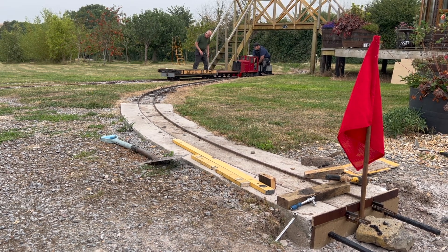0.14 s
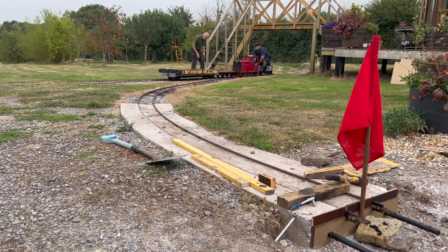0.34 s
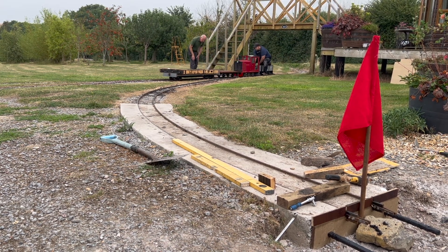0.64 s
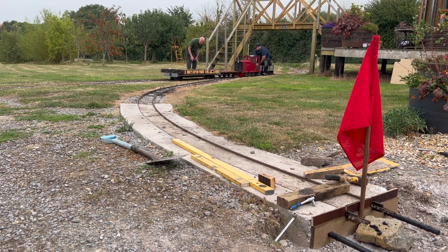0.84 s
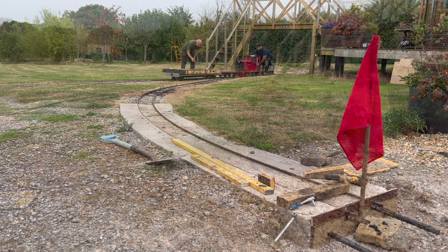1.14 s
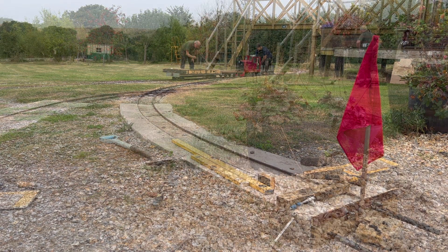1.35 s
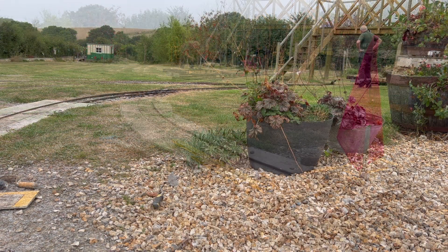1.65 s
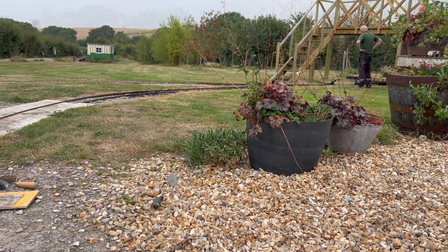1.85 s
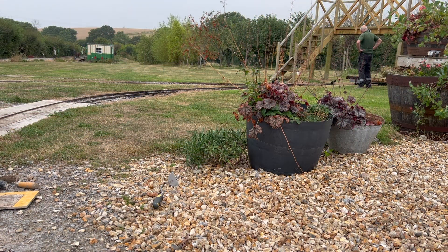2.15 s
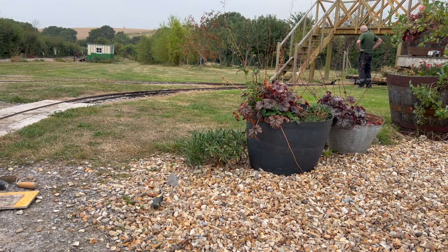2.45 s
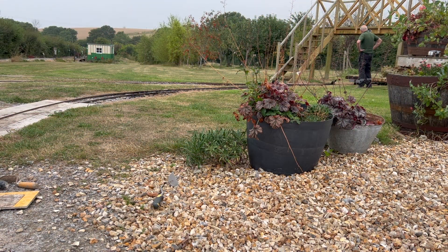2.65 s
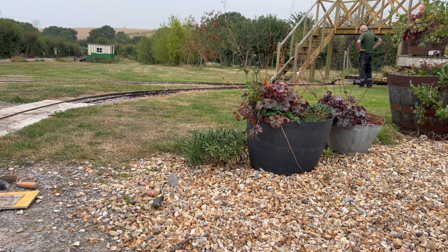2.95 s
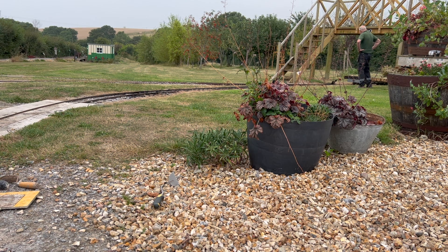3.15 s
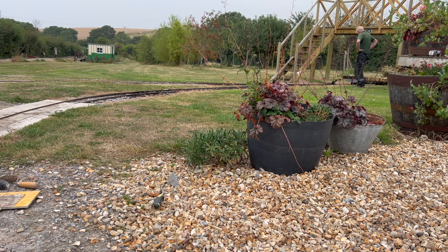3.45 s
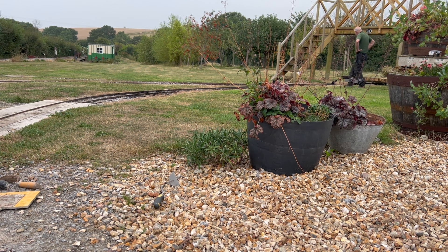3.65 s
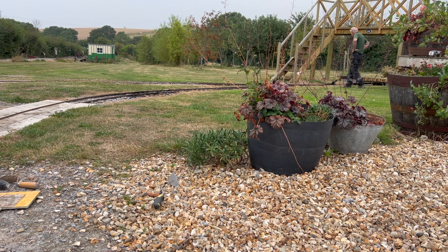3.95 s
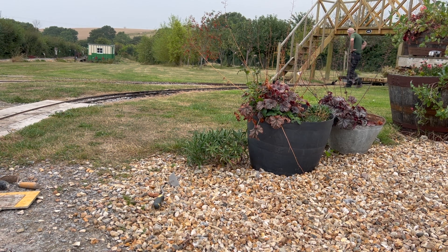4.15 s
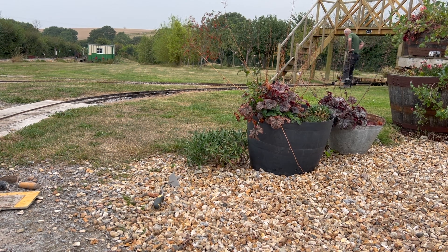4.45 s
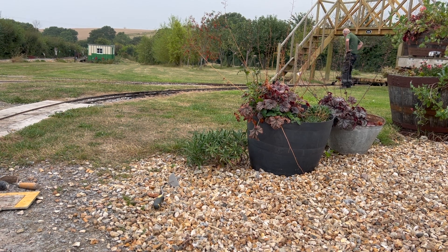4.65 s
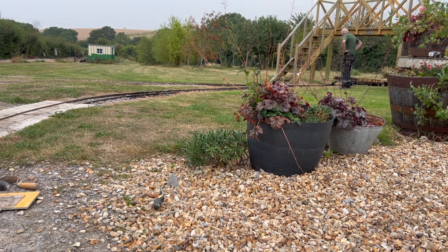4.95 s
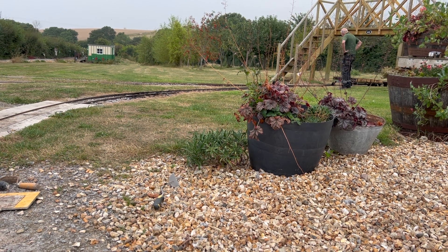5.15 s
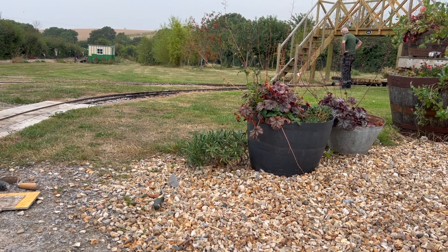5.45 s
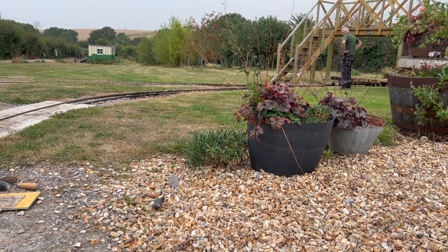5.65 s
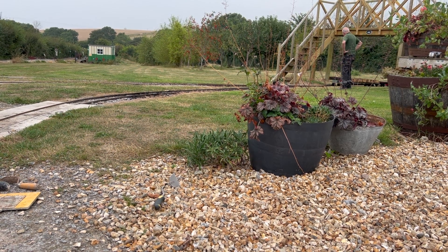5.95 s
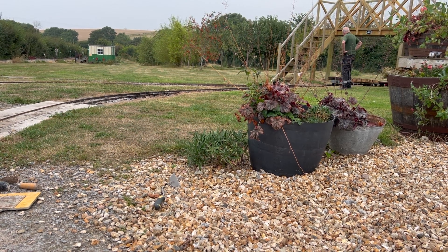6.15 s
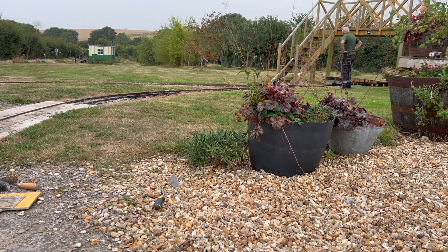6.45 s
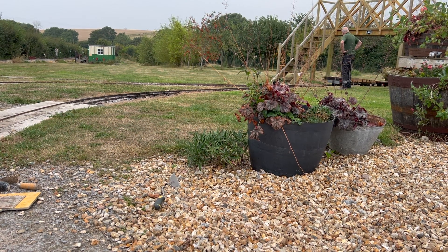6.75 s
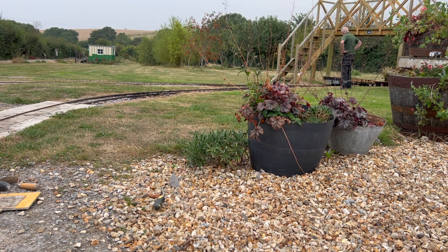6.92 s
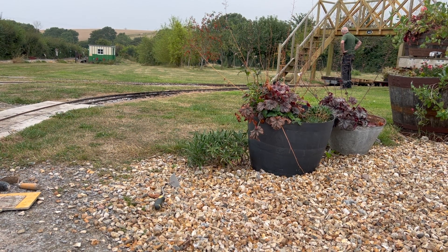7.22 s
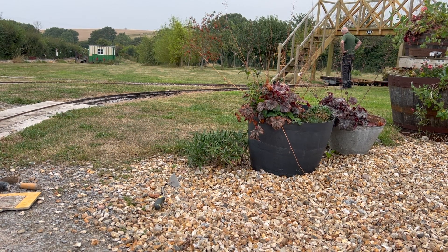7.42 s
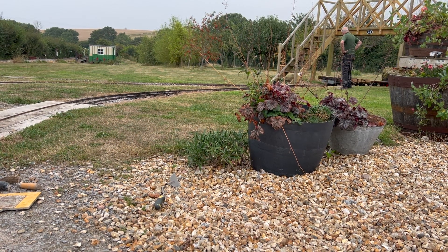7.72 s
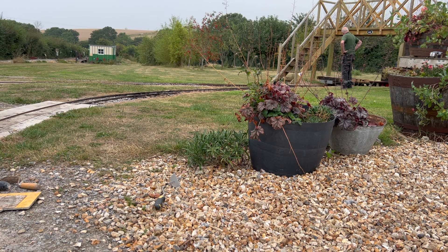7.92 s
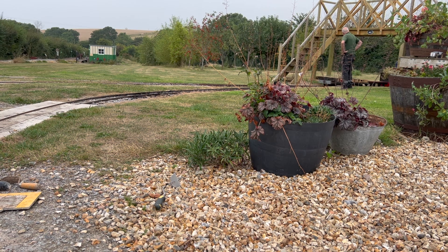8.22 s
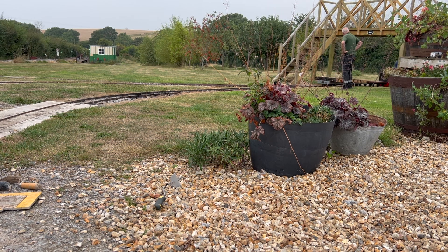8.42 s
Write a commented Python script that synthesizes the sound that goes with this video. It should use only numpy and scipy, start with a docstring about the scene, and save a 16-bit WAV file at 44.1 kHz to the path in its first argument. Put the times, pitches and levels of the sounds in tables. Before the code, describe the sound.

From 0 to about 1 s a small single-cylinder petrol engine idles in an open garden: roughly ten lumpy, irregular thumps a second, each puffing hollowly through the silencer, knocking the body and shaking loose tinware into thin rattles and pings. A dull knock falls at 0.3 s; a dry, bright snap with a tiny ring at 1.1 s. Between 1 and 1.8 s the idle dissolves into a hauling engine, a fast low putter of about 22 beats a second with fluttering exhaust. Around 2.3 to 2.7 s it sags in speed and pitch, stays slower until about 3.1 s, recovers by 3.7 s, then hunts gently up and down. Mechanical drone, hiss and high whine grow slightly, brighter from 5 to 7.3 s. A distant bird gives quick high whistles from 5.8 to 6.5 s. The engine continues to the end at 8.6 s, slowing slightly. Stereo outdoor pickup, little reverberation.

```python
"""Across a garden, a small single-cylinder petrol locomotive, heard from two places joined by a dissolve.
At the first it idles: slow uneven pulses ring the silencer, knock the body and rattle the tinware.
At the second it hauls a wagon: harmonics thump once a cycle while the governor hunts, over silencer flutter,
a fan's tone and shaped noise for the mechanism. A knock, a dry snap and a far bird's whistles are added.
Two microphone ports hear each sound with differences of level, phase and likeness."""
import sys
import numpy as np
from scipy import signal
from scipy.fft import rfft, irfft, next_fast_len
from scipy.io import wavfile
from scipy.ndimage import uniform_filter1d

SR = 44100
rng = np.random.default_rng(int(sys.argv[2]) if len(sys.argv) > 2 else 0)


def master_out(mix):
    """Clip the mix to full scale and print it as 16-bit PCM to the path in sys.argv[1]."""
    frames = np.transpose(np.atleast_2d(mix))
    ceiling = np.clip(frames, -1, 1)
    pcm = np.round(ceiling * 32767).astype(np.int16)
    wavfile.write(sys.argv[1], SR, pcm)


N = 378378
TIME = np.arange(N) / SR
DIRECT = np.array([[1], [0]])  # puts a sound in row 0, with no diffuse part in row 1
CRUISE_PER_S, MIDWAY_S = 22, 5  # reference firings per second, reference moment

# Engine speed while hauling: t/s, firing rate/Hz
FIRING = [(1.0, 23.52), (2.08, 21.6), (2.29, 21.4), (2.7, 17.79), (3.08, 17.92), (3.73, 21.86),
          (4.29, 20.91), (4.76, 22.75), (5.22, 22.05), (5.46, 22.74), (5.89, 21.62), (6.33, 22.19),
          (6.77, 21.91), (7.01, 22.72), (7.2, 21.97), (7.63, 23.42), (7.86, 22.54), (8.26, 22.35),
          (8.58, 20.52)]
# Hauling effort: t/s, thump level/dB, silencer flutter level/dB, fan whistle level/dB
EFFORT = [(1.0, -33.5, -34, -75), (1.75, -28, -34.5, -72), (2.0, -29, -36, -63.5), (2.3, -27.5, -34.5, -62),
          (2.5, -31.5, -41, -78), (2.7, -28.5, -39, -80), (3.0, -28.5, -42.5, -78), (3.3, -29, -40.5, -76),
          (3.75, -28, -33.5, -67.5), (4.2, -29.5, -37.5, -60), (4.4, -28.5, -32, -62.5),
          (4.8, -27.5, -34, -59.5), (5.45, -28, -33, -62), (5.7, -28, -32.5, -57.5),
          (5.95, -27.8, -35, -68), (6.3, -27, -36, -59), (6.75, -28, -33, -67), (7.0, -27, -30, -59),
          (7.2, -28.5, -35, -67), (7.55, -27.7, -33.5, -59), (7.9, -28.5, -33, -62),
          (8.25, -28.5, -33.5, -70), (8.58, -29.5, -34.5, -70)]


def hauling():
    """Exhaust, silencer, fan and mechanical noise share one course of firing rate and cycles."""
    rate = columns(FIRING)[0]
    surge = wander(per_s=7)
    thump_db, flutter_db, fan_db = columns(EFFORT)
    cycles = np.cumsum(rate * (TIME >= FIRING[0][0])) / SR
    crank = np.cos(2 * np.pi * (2 * cycles - .2))  # once each turn, twice each cycle
    sound = exhaust_with_sway(cycles, rate, thump_db)
    sound = sound + silencer_flutter(flutter_db + 3.5 * crank + .4 * surge)
    sound = sound + DIRECT * fan_whistle(cycles, fan_db)
    return sound + mechanical_noise(rate, crank, surge)


# Continuous low noise under the thumps: f/Hz, relative density/dB
SWAY = [(20, -30), (38, -5), (52, 1), (75, -1), (110, 0), (170, -1), (250, -14), (450, -30), (600, -60)]


def exhaust_with_sway(cycles, rate, thump_db):
    """The exhaust's thumps over continuous low noise, both following the hauling effort."""
    sway = noise(spectrum(SWAY), patchy_db=0.0, size=2048)
    return amp(thump_db) * (DIRECT * exhaust(cycles, rate) + amp(-10) * sway)


# Exhaust harmonics at the cruising rate: f/Hz, relative level/dB
PIPE = [(20, -46), (44, -13.5), (66, -6), (88, 0), (110, 3), (132, 0.5), (154, -2.5), (176, -4.5),
        (200, -23.5), (260, -29), (330, -19)]
# Exhaust harmonics change level over time, each at its own rate:
# multiple of the firing rate, change of relative level/(dB per s)
HARMONIC_DRIFT = [(2, 1), (3, 0.2), (4, 0.6), (5, 0), (6, 0), (7, 0.26), (9, 0.5)]
NOTE_WAVER_DB = 1.0  # each exhaust note wavers on its own


def exhaust(cycles, rate):
    """Harmonics of the firing rate in step make one thump a cycle; strength and timing vary by firing."""
    steps = np.arange(int(cycles[-1]) + 2)
    strength, slip = (np.interp(cycles, steps, v) for v in rng.standard_normal((len(steps), 2)).T)
    beat = np.zeros(N)
    for k in range(1, 14):
        # the lowest notes leave the pipe late
        lag = 7.5 / (1 + (k / 3.2) ** 12)
        turns = k * (cycles + .03 + .006 * slip) - (.3 - lag) / (2 * np.pi)
        db_per_s = np.interp(k, *np.transpose(HARMONIC_DRIFT))
        drift_db = db_per_s * (TIME - MIDWAY_S) + NOTE_WAVER_DB * wander(per_s=6)
        # slower pulses are longer, so their spectrum slides down
        pipe_hz = k * rate * (CRUISE_PER_S / rate) ** .6
        beat -= amp(drift_db + read(PIPE, pipe_hz)) * np.cos(2 * np.pi * turns)
    return evened(beat) * (1 + .06 * strength)


SINGING = .6  # share of the flutter's power that sings


def silencer_flutter(level_db):
    """Noise through the silencer's resonances, mixed with the singing of its chambers."""
    flutter = noise(silencer, patchy_db=.4, size=2048)
    flutter = np.sqrt(1 - SINGING) * flutter + np.sqrt(SINGING) * DIRECT * singing()
    return amp(level_db) * flutter


# Resonances of the silencer's chambers: f/Hz, width/Hz, relative level/dB
SILENCER = [(222, 46, 3), (282, 46, -5.5), (370, 65, -22)]
SING_STRAY = .22  # pitch stray, in resonance widths


def silencer(hz):
    """Response of the silencer's resonant chambers."""
    return level_humps(SILENCER, hz)


def singing():
    """The silencer's chambers hum unsteady notes that stray about their resonances."""
    notes = []
    for f, width, db in SILENCER:
        pitch_hz = f + SING_STRAY * width * wander(per_s=40)
        notes.append(amp(db) * np.sqrt(width) * np.sin(2 * np.pi * np.cumsum(pitch_hz) / SR))
    return evened(sum(notes))


FAN_ORDER = 30  # blade passes in one cycle


def fan_whistle(cycles, level_db):
    """A fan sings one tone at its blade-pass rate, wavering a little in level and phase."""
    level = amp(level_db + 1.2 * wander(per_s=8))
    return level * np.sqrt(2) * np.sin(2 * np.pi * FAN_ORDER * cycles + 0.14 * wander(per_s=21))


# Spectra of the mechanical noise, from drone up to fizz: f/Hz, relative density/dB
DRONE = [(250, -23), (420, -10.5), (560, -7), (660, -6), (862, -3), (1260, -3.5), (1500, -3.5), (1950, -53),
         (3300, -120)]
HISS = [(880, -43), (1500, -4.5), (1660, -4.5), (1980, -5), (2330, -7), (2640, -2), (2950, -4), (3270, -6),
        (4230, -11), (7000, -8), (9100, -34), (15400, -120)]
WHINE = [(4120, -19), (7000, -7.5), (7450, 2.5), (7930, 1.5), (8870, 0.5), (9360, 3.5), (10000, -13),
         (13000, -60), (22000, -120)]
FIZZ = [(6000, -46), (10200, 5.5), (11000, 1), (12700, -17.5), (13300, 5), (13900, -49), (14000, -23),
        (14300, -6), (15800, -3)]
# Casing resonances: f/Hz, width/Hz, lift/dB
CASING = [(860, 54, 0.5), (1148, 67, 6), (1558.5, 28, 8), (1940, 26, 5), (3860, 68, 10.5), (6660, 126, -19),
          (8060, 150, 3), (8710, 160, 8)]
# Layer laws: level/dB at cruising speed midway, level/dB per extra firing a second,
# level/dB per s of approach, level/dB of surging
DRONE_LAW = (-50, 1.4, 1.0, 0.5)
HISS_LAW = (-46.5, 0.7, .5, 0.02)
WHINE_LAW = (-53.5, .5, 0.35, -1.1)  # before the swell below
# Extra growth of the whine as the engine comes into the open: start t/s, end t/s, rise/dB
WHINE_SWELL = (4.7, 7.33, 4.55)
# Broad, rough whirrs: f/Hz, width/Hz, level/dB midway, level/dB per s of approach, wavering/dB
WHIRRS = [(2633, 250, -56.5, 0.4, 1.4), (3270, 330, -61, 2, 1.5)]


def mechanical_noise(rate, crank, surge):
    """Drone, hiss and whine follow speed, approach and crank; fizz, steady howl and growing whirrs join."""
    drone_db, hiss_db, whine_db = (
        db + by_speed * (rate - CRUISE_PER_S) + by_time * (TIME - MIDWAY_S) + by_surge * surge
        for db, by_speed, by_time, by_surge in (DRONE_LAW, HISS_LAW, WHINE_LAW))
    swell_start, swell_end, swell_db = WHINE_SWELL
    whine_db = whine_db + swell_db * ramp(swell_start, swell_end)
    drone = noise(spectrum(DRONE, CASING), patchy_db=1.1)
    howl = noise(lambda hz: humps([(1035, 70, .9)], hz), patchy_db=1.5, size=2048)
    hiss = noise(spectrum(HISS, CASING), patchy_db=1.07)
    whine = noise(spectrum(WHINE, CASING), patchy_db=1.5)
    fizz = noise(spectrum(FIZZ), patchy_db=3.0)
    sound = amp(drone_db + 1.0 * crank) * drone
    sound += amp(hiss_db + 0.4 * crank) * hiss
    sound += amp(-61.5) * howl
    sound += amp(whine_db - 0.96 * crank) * whine  # strongest when the drone is weakest in the turn
    sound += amp(-64 + 2.42 * (whine_db + 53.5)) * fizz  # exaggerates the whine's slower changes
    for f, width, db, by_time, waver_db in WHIRRS:
        whirr = noise(lambda hz: humps([(f, width, 1)], hz), patchy_db=2)
        sound += amp(db + by_time * (TIME - MIDWAY_S) + waver_db * wander(per_s=9)) * whirr
    flicker_db = .6 * wander(per_s=30)
    return amp(flicker_db) * sound


# Idling: t/s, change of rumble and hiss level/dB, level of the frame's boom/dB
IDLE = [(0.0, -1, -56), (.14, -1, -42), (0.26, -1.5, -50), (.33, -3, -41.5), (.5, -4, -45.5),
        (.66, -4, -40), (0.76, -6, -60), (.92, -5, -66), (1.07, -1.5, -38), (1.2, -2.5, -44),
        (1.33, -1, -39), (1.6, 0, -35)]
# Idling firings: t/s, thump peak level/dB, silencer ring level/dB, body knock level/dB, tin rattle level/dB
CHUGS = [(.004, -24.5, -53, -48, -52), (0.082, -30, -34.5, -45.5, -51), (.154, -20, -35, -44, -51),
         (0.239, -24.5, -51, -48, -52), (0.319, -20.5, -27, -44.5, -50), (0.413, -22, -49, -50, -47),
         (0.506, -23, -59, -52, -48), (0.602, -23, -32.5, -46, -49), (0.705, -25.5, -43, -50.5, -47),
         (0.828, -34, -40, -48, -46), (0.953, -28, -65, -53, -47), (1.072, -23, -35.5, -45, -47),
         (1.189, -42, -43, -57, -45), (1.315, -38, -35, -45.5, -46), (1.44, -32, -41, -53, -45),
         (1.56, -27, -27, -52, -45)]
# Body resonances: f/Hz, width/Hz, relative level/dB
BODY = [(436, 220, -0.5), (780, 100, -0.5), (1070, 170, 1), (1290, 200, -7.5)]
# Spectra of the idling rumble and hiss: f/Hz, relative density/dB
RUMBLE = [(15, -36), (25, 5), (59, 8), (144, 1), (188, 3.5), (231, 2), (300, -13.5), (464, -15.5),
          (520, -15.5), (680, -50), (1140, -120)]
IDLE_HISS = [(260, -22), (450, -7.5), (906, -8), (1080, -8), (1850, -7), (2980, -4.5), (4200, -9),
             (4520, -8), (7970, -11), (10100, -17.5), (12500, -27.5), (13200, -30), (13800, -52),
             (14400, -22), (15800, -28)]
# Bonnet resonances: f/Hz, width/Hz, lift/dB
BONNET = [(1092, 93, 6.5), (2080, 80, 5), (2680, 99, -8), (3080, 110, 4.5), (4150, 350, -10),
          (4570, 120, 4.5), (4830, 80, -14), (5680, 170, 6.5)]
RUMBLE_DB, IDLE_HISS_DB = -32.5, -39.5  # before the changes in IDLE


def idling():
    """Slow uneven firings; each rings the silencer, knocks the body and shakes the tinware for a moment."""
    level_db, boom_db = columns(IDLE)
    at, thump_db, ring_db, knock_db, rattle_db = np.transpose(CHUGS)
    beat = thumps(at, amp(thump_db), hz=105, rise=.0055, fall=.007)
    throb = bursts(at, 0 * at, late=.015, length=.03)
    ring = bursts(at, ring_db, late=0.011, length=.022) * noise(silencer, patchy_db=-0.5, size=2048)
    body = noise(lambda hz: level_humps(BODY, hz), patchy_db=1.5)
    knock = bursts(at, knock_db, late=.01, length=0.044) * body
    boom = noise(lambda hz: humps([(288.2, 44, 1)], hz), patchy_db=1.0, size=2048)
    rumble = noise(spectrum(RUMBLE), patchy_db=1.1, size=2048)
    hiss = noise(spectrum(IDLE_HISS, BONNET), patchy_db=.7)
    low = DIRECT * beat + ring + knock
    low += amp(RUMBLE_DB + level_db) * rumble + amp(boom_db) * boom
    tin = rattle(bursts(at, rattle_db, late=0.012, length=0.047)) + DIRECT * pings()
    return low + tin + amp(IDLE_HISS_DB + level_db + 3.2 * throb) * hiss


def thumps(at, peaks, hz, rise, fall):
    """Lone exhaust pulses: one quick swing peaking at each time."""
    t = np.arange(-2000, 2000) / SR
    shape = np.exp(-(t / np.where(t < 0, rise, fall)) ** 2) * np.cos(2 * np.pi * hz * t + 0.21)
    train = np.zeros(N)
    train[np.round(at * SR).astype(int)] = peaks
    return signal.oaconvolve(train, shape, "same")


# Ringing parts of the tinware: f/Hz, relative level/dB, t60/s (t60 for the rattle only)
TINWARE = [(1700, -9, .02), (2070, -6, .02), (2480, -1, .045), (2630, 0, .045), (2930, -1, .045),
           (3090, -7, .035), (3380, -4, .03)]
TICKS_PER_S, TICK_SPREAD_DB, MODE_SPREAD_DB = 85, 1, 3.5  # mean tick rate, random level spreads


def rattle(shake):
    """Loose tin ticks several times a shake; each tick rings all modes unevenly, and the yard scatters it."""
    t, out = np.arange(3000) / SR, np.zeros(N)
    turns = np.cumsum(TICKS_PER_S * (1 + .4 * wander(per_s=60))) / SR
    ticks = np.diff(np.floor(turns), prepend=0) * amp(TICK_SPREAD_DB * rng.standard_normal(N))
    for hz, db, t60 in TINWARE:
        ring = amp(db - 60 * t / t60) * np.minimum(t / .003, 1)
        share = amp(MODE_SPREAD_DB * rng.standard_normal(N))
        out += signal.oaconvolve(ticks * share * shake, ring * np.sin(2 * np.pi * hz * t))[:N]
    out *= np.linalg.norm(shake) / np.linalg.norm(out)
    scatter = rng.standard_normal(len(t)) * amp(-60 * t / .02)
    scattered = signal.oaconvolve(out, scatter / np.linalg.norm(scatter))[:N]
    return np.array([out, scattered])


# Loudest single tin pings: t/s, f/Hz (the nearest part is struck), level of that part/dB
PINGS = [(0.06, 2480, -40), (0.07, 3090, -40), (0.095, 2930, -41), (0.144, 2630, -40), (0.145, 2930, -40),
         (0.148, 2480, -40), (0.157, 2090, -42), (0.168, 2480, -39), (0.178, 2630, -41), (0.225, 2480, -42),
         (0.276, 2090, -42), (0.314, 2630, -42), (0.318, 2930, -41), (0.338, 2090, -42), (0.401, 2480, -38),
         (0.407, 2090, -42), (0.51, 2930, -40), (0.519, 3390, -40), (0.586, 2090, -42), (0.592, 2630, -42),
         (0.614, 3390, -41), (0.709, 2930, -38), (0.731, 2480, -42), (0.731, 2630, -41), (0.818, 2480, -42),
         (0.834, 2930, -38), (0.855, 2630, -42), (0.858, 2480, -40), (0.869, 2930, -40), (0.919, 2930, -41),
         (0.961, 2930, -40), (0.982, 2480, -41), (0.984, 2090, -42), (0.984, 2930, -41), (1.06, 2480, -36),
         (1.06, 2630, -37), (1.064, 2090, -41), (1.095, 2630, -39), (1.096, 2480, -39), (1.124, 3390, -41),
         (1.175, 2480, -39), (1.21, 2630, -39), (1.341, 2930, -36)]
PING_RISE_S, PING_T60_S, OTHER_PARTS_DB = .007, .085, -14


def pings():
    """Single knocks on the tinware: the part struck rings out, the others answer faintly."""
    t, out = np.arange(3000) / SR, np.zeros(N + 3000)
    part_hz, part_db, _ = np.transpose(TINWARE)
    shape = np.minimum(t / PING_RISE_S, 1) * amp(-60 * np.maximum(t - PING_RISE_S, 0) / PING_T60_S)
    start_turns = rng.random((len(PINGS), len(TINWARE)))
    for (s, hz, db), turn in zip(PINGS, start_turns):
        struck = np.arange(len(TINWARE)) == np.argmin(abs(part_hz - hz))
        gains = amp(db + np.where(struck, 0, OTHER_PARTS_DB + part_db))
        tones = np.sin(2 * np.pi * (part_hz[:, None] * t + turn[:, None]))
        out[round(s * SR):][:len(t)] += shape * (gains @ tones)
    return out[:N]


# A knock and a dry snap: t/s, level/dB, low edge f/Hz, high edge f/Hz
SNAPS = [(.278, -40, 400, 1300), (1.13, -35, 3000, 8000)]
# Brief ring of the snap, sagging in pitch: f/Hz, sag/(Hz per s), level/dB, t60/s
SNAP_RING = [(1880, 7000, -37, .13), (5300, 0, -39, .05), (6300, 0, -35, .05), (7800, 0, -37, .05)]
SNAP_RING_S = 1.127  # start of the ring


def snap():
    """Short bursts of noise, one dull, one bright with a short ring."""
    out = np.zeros((2, N))
    for s, db, low_hz, high_hz in SNAPS:
        burst = noise(lambda hz: hz / (hz + low_hz) / (1 + (hz / high_hz) ** 2), patchy_db=2.0, size=256)
        swell = np.exp(-((TIME - s) / np.where(TIME < s, .005, .011)) ** 2)
        out += amp(db) * swell * burst
    after = np.clip(TIME - SNAP_RING_S, 0, .1)
    for hz, sag_hz, db, t60 in SNAP_RING:
        ring = np.sin(2 * np.pi * after * (hz - sag_hz * after / 2)) * np.minimum(after / .003, 1)
        out += DIRECT * amp(db - 60 * np.maximum(TIME - SNAP_RING_S, 0) / t60) * ring
    return out


# Notes of the far bird: middle t/s, f/Hz, slide/Hz, level/dB
TWITTER = [(5.812, 5070, -200, -54), (5.897, 3900, 0, -54), (5.903, 4280, 300, -50),
           (5.965, 4370, 550, -48), (5.981, 5000, -450, -46), (6.076, 4440, 250, -53),
           (6.089, 5080, 100, -41.5), (6.158, 4250, 300, -53), (6.18, 5150, -450, -51),
           (6.27, 5020, -250, -48), (6.362, 4950, -400, -52), (6.47, 4230, 0, -54)]
NOTE_S = .022  # length of each note


def bird():
    """Short whistles swell and fade, most gliding in pitch."""
    out = np.zeros(N)
    for s, hz, slide_hz, db in TWITTER:
        u = ramp(s - NOTE_S / 2, s + NOTE_S / 2)
        turns = NOTE_S * (hz * u + slide_hz * (u ** 2 - u) / 2)
        out = out + amp(db) * np.sqrt(2) * np.sin(np.pi * u) * np.sin(2 * np.pi * turns)
    return out


def noise(colour, patchy_db, size=1024):
    """Two unrelated noises of one colour (gain by Hz) sharing drifting patches."""
    frames, hz = 4 * N // size + 5, np.fft.rfftfreq(size, 1 / SR)
    a, b, c, d, patches = rng.standard_normal((frames, len(hz), 5)).T
    patches = uniform_filter1d(patches, size=9, axis=0)  # smooth over frequency
    patches = evened(uniform_filter1d(patches, size=10, axis=1))  # smooth over time
    z = np.array([a + 1j * b, c + 1j * d]) * colour(hz)[:, None] * amp(patchy_db * patches)
    return evened(signal.istft(z, nperseg=size, noverlap=3 * size // 4)[1][:, :N])


def spectrum(points, resonances=()):
    """Noise colour from density points, lifted in dB by resonances."""
    return lambda hz: amp(read(points, hz) + humps(resonances, hz))


def humps(modes, hz):
    """Sum of bell-shaped resonance curves, each (Hz, width, height)."""
    return sum(height / (1 + (2 * (hz - f) / width) ** 2) ** 2 for f, width, height in modes)


def level_humps(modes, hz):
    """Resonance curves whose heights are given in dB."""
    return humps([(f, width, amp(db)) for f, width, db in modes], hz)


def wander(per_s):
    """Slow chance of rms 1 that changes about per_s times a second."""
    knots = np.arange(0, N / SR + 1, 1 / per_s)
    return evened(np.interp(TIME, knots, rng.standard_normal(len(knots))))


def bursts(at, levels_db, late, length):
    """One rounded swell after each firing; late and length in s."""
    return sum(amp(db) * np.exp(-((TIME - s - late) / length) ** 2) for s, db in zip(at, levels_db))


def ramp(start, end):
    """Straight rise from 0 to 1 between two times in s."""
    return np.clip((TIME - start) / (end - start), 0, 1)


def amp(db):
    """Level in dB to amplitude."""
    return 10 ** (np.asarray(db) / 20)


def evened(x):
    """Scales a signal to rms 1."""
    return x / np.sqrt(np.mean(x ** 2) + 1e-20)


def read(points, hz):
    """Reads a (Hz, value) curve along a logarithmic frequency axis."""
    f, value = np.transpose(points)
    return np.interp(np.log(hz + 1), np.log(f + 1), value)


def columns(rows):
    """Draws each column of a timed table as a curve over the whole scene."""
    s, *values = np.transpose(rows)
    return [np.interp(TIME, s, v) for v in values]


# Likeness of the two microphone ports: f/Hz, share in common (0-1)
LIKENESS = [(60, 0.99), (300, 1), (600, 0.85), (1500, 0.73), (3000, 0.57), (6000, 0.24), (9000, 1),
            (15000, 0.85)]
# Balance of the ports: f/Hz, left minus right level/dB
SIDES = [(60, .6), (110, -.1), (200, -1.4), (380, -1), (700, 0), (1290, -2), (2380, -3.5), (4400, 2.5),
         (8120, 0), (15000, 0)]


def ports(pair, phase):
    """Spreads a sound (row 0) and its diffuse part (row 1) on two microphone ports."""
    size = next_fast_len(N)
    hz = np.fft.rfftfreq(size, 1 / SR)
    a, b = rfft(pair, size)
    same = np.clip(read(LIKENESS, hz), 0, 1)
    side = amp(read(SIDES, hz) / 2)
    lag = np.exp(-1j * np.interp(hz, *np.transpose(phase)))
    right = (same * a + np.sqrt(1 - same ** 2) * b) * lag
    return irfft([a * side, right / side], size)[:, :N]


# Dissolve from the first place to the second: start t/s, end t/s
DISSOLVE = (0.97, 1.81)
# Phase between the ports at each place: f/Hz, left lead/rad
HAUL_PHASE = [(0, 0), (1550, -1.9), (1890, -0.7), (2840, -2.3), (5860, 3.2), (7750, -5.2), (9730, -8.8),
              (10900, -10.4), (11500, -12.5), (12600, -12.7), (13200, -15.7), (14400, -15.8),
              (15200, -19.0), (16700, -18.6)]
IDLE_PHASE = [(0, 0), (1380, -1.0), (3620, 1.0), (4220, -3.4), (5170, -12.0), (8010, -11.9), (9730, -15.2),
              (10900, -16.5), (11500, -18.7), (12700, -19.1), (13100, -21.9), (14400, -22.1),
              (15200, -25.3), (16700, -24.9)]


def scene():
    """Dissolves from idling to hauling; the snaps and the bird stand outside the fade."""
    share = ramp(*DISSOLVE)
    first_place = ports(idling() * (1 - share) + snap(), IDLE_PHASE)
    second_place = ports(hauling() * share + DIRECT * bird(), HAUL_PHASE)
    return first_place + second_place


EDGE_HZ = 15850  # upper band limit


def record(dry):
    """The microphone's bass cut, then the band limit."""
    cut = signal.sosfiltfilt(signal.butter(2, 38, "highpass", fs=SR, output="sos"), dry)
    band_limit = signal.firwin(511, EDGE_HZ, window=("kaiser", 9), fs=SR)
    return signal.oaconvolve(cut, band_limit[None], "same")


dry = scene()
out = record(dry)
master_out(out)
```